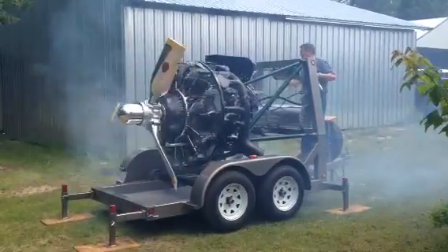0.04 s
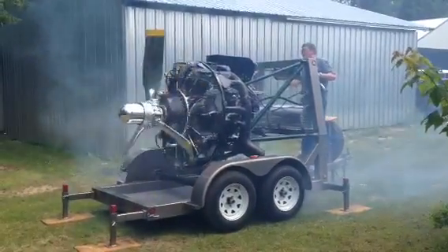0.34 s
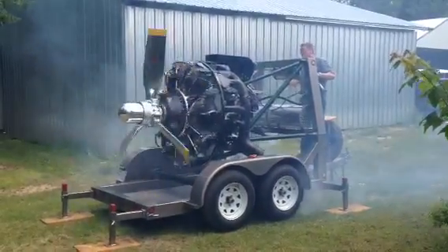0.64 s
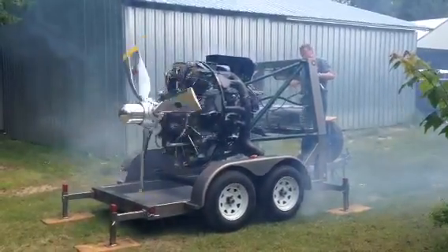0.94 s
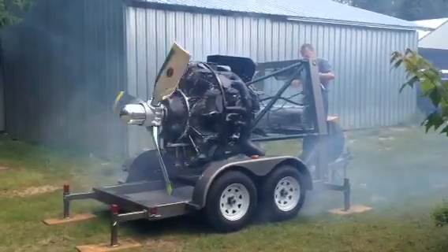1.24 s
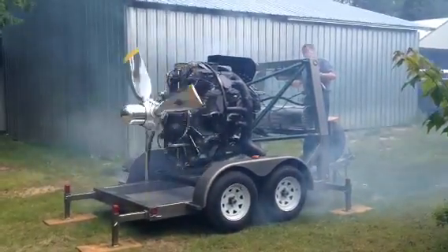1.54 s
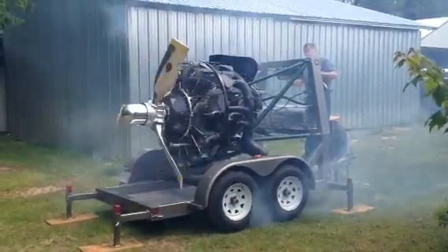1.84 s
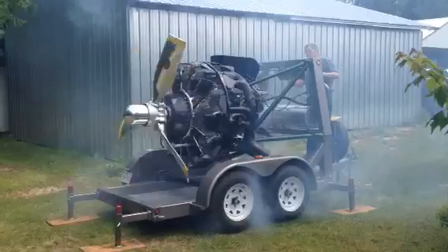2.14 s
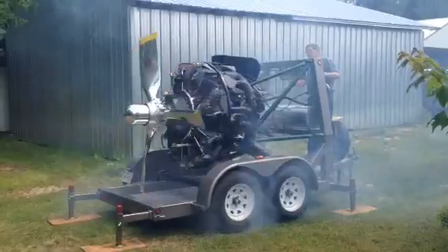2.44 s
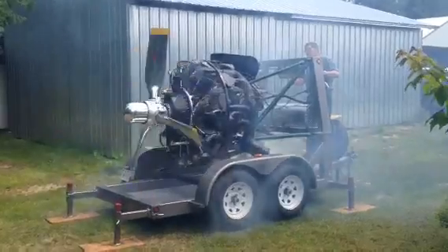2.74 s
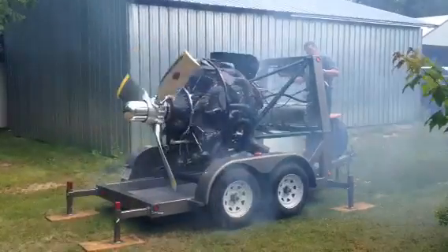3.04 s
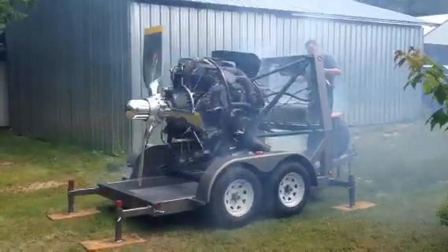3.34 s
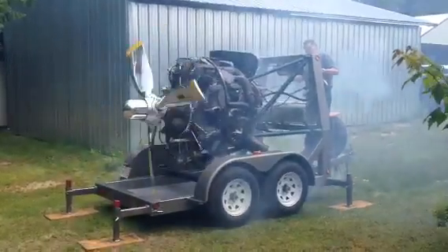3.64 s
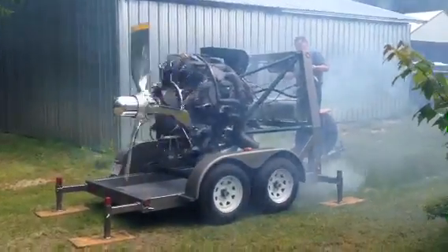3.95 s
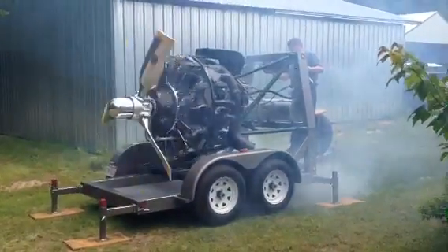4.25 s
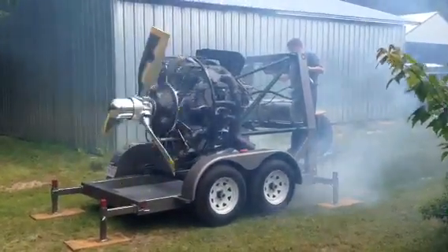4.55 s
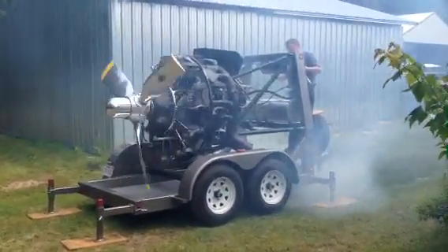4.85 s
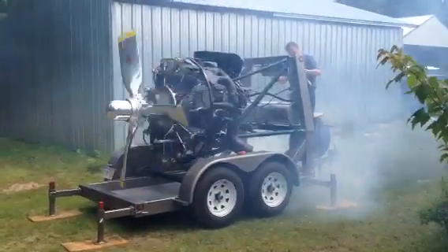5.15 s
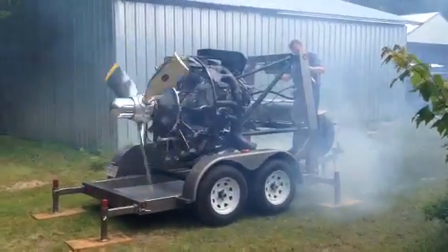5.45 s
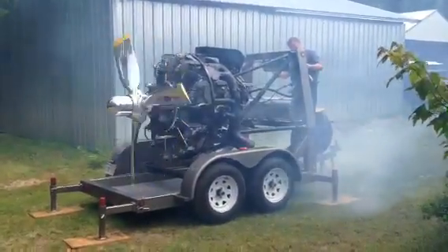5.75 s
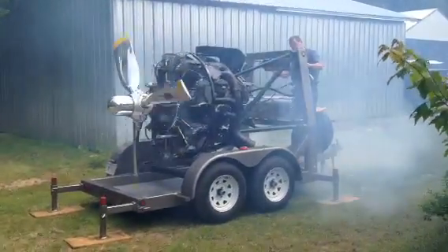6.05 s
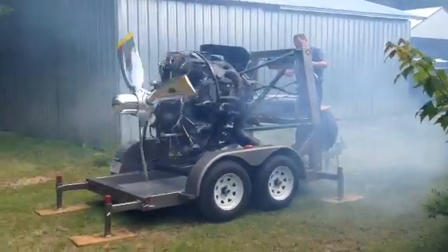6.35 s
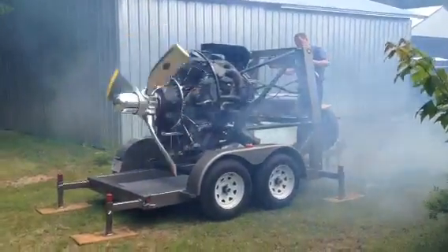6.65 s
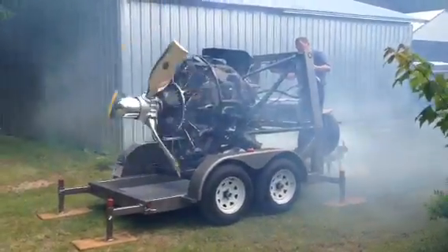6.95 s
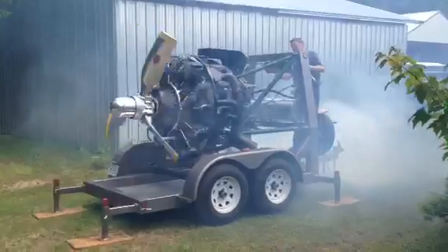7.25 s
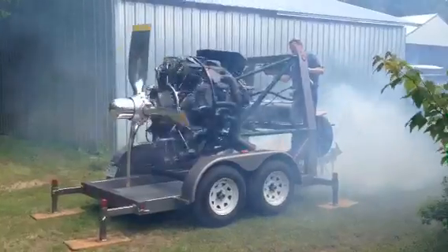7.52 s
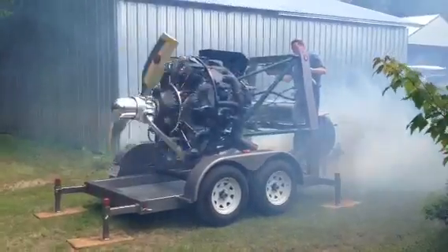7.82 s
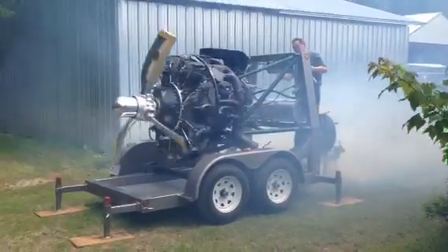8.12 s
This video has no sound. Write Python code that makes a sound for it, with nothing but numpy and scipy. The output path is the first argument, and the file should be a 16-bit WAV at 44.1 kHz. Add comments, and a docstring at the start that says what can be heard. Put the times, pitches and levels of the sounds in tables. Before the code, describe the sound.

Gears rattle, valves clack and unfired cylinders chuff as a big radial aircraft engine turns over in a yard. Sharp, barking exhaust pops with low thumps come singly and in clusters, running together briefly before stumbling again. In the last couple of seconds the engine speeds up and fires almost continuously, with short gaps. A slight outdoor echo trails the pops.

```python
"""A big radial aircraft engine starts on a trailer in front of a metal shed, outdoors.
First a few cylinders pop through open exhaust stubs (short pipes), and the crank slows with a faint whistle.
More pops follow, joining into two short, even runs near 3 s before falling back to single pops.
From about 6.3 s the engine catches and fires in three more runs. All along, gear rattle, valve clacks
and the chuff of unfired cylinders follow the speed of the crank, and the yard adds a short echo."""
import sys
import numpy as np
from scipy import signal
from scipy.io import wavfile
from scipy.ndimage import uniform_filter1d

SR = 44100
rng = np.random.default_rng(int(sys.argv[2]) if len(sys.argv) > 2 else 0)


def transcribe(u):
    """Save the signal u as a 16-bit wav file named by the first command-line argument.

    u: samples, shape (n,) or (channels, n), limited to [-1, 1]; the rate is SR.
    q: integer samples, one column per channel.
    """
    v = np.clip(np.atleast_2d(u).T, -1, 1)
    q = np.round(v * 32767).astype(np.int16)
    wavfile.write(sys.argv[1], SR, q)


N = 360738

# How long the yard takes to fade by 60 dB: pitch_hz, fade_s
YARD_FADE = [(150, 0.23), (1500, 0.26), (8000, 0.2), (15000, 0.1)]
# How fast the crank turns: time_s, share_of_full_speed
CRANK_SPEED = [(0, 0.42), (.6, 0.28), (1.08, 0.23), (1.48, 0.25), (2.45, 0.57), (3.08, 0.52), (3.7, 0.48),
               (4.05, 0.37), (4.5, 0.42), (5.35, 0.37), (6.2, 0.38), (6.79, 0.94), (6.87, .75),
               (7.17, 0.73), (7.33, .47), (7.7, 0.77), (8.18, 0.84)]
# The tone of each noise, from low to high: pitch_hz, relative_level_db
PUMPING_TONE = [(30, -51), (80, -10), (122, -3), (220, -2), (330, -10), (900, -32)]  # unfired cylinders blowing into the exhaust
RATTLE_TONE = [(70, -54.5), (170, -4), (300, -3), (470, 1), (575, 2), (720, -2), (1100, 2.5), (1750, 1.5),
               (2400, 2), (3100, -6.5), (4200, -20), (8000, -36.5)]  # gears and cams
AIR_TONE = [(3000, -18), (5000, -3.5), (8300, 5), (12000, -6.5), (15300, -6)]  # hiss of unburnt air
CLACK_TONE = [(500, -54), (1100, -10), (2400, 7), (4400, -21), (8400, -1.5), (11000, 0.5), (15300, -10)]  # steel hitting steel
JET_TONE = [(2000, -30.5), (3200, -28), (4500, -19), (6400, -4), (8500, -2), (11500, -6.5), (13500, -5.5),
            (15300, -5)]  # sharp crack of the exhaust jet
BARK_TONE = [(90, -62), (300, -13.5), (750, -2.5), (1150, -7), (1550, -2), (2750, -2), (3500, -6.5),
             (4600, -17), (8000, -45)]  # blast of gas in the stub
THUMP_TONE = [(20, -49), (50, -44.5), (90, -12.5), (160, 4.5), (300, -6.5), (700, -22.5)]  # deep push of the gas
# Separate steel clacks at set times while the crank turns slowly: start_s, level_db
SEPARATE_VALVE_CLACKS = [(0.603, -34), (1.106, -58), (1.515, -26), (4.007, -31), (5.529, -26), (5.829, -38)]
# The notes an exhaust stub can ring at: pitch_hz, width_hz, relative_level_db
STUB_NOTES = [(846, 5, 18), (1401, 140, 6), (1600, 13, 5.5), (1973, 21, 5.5), (2360, 130, 0),
              (2756, 33, -5)]
# Single firings. Crack is the jet's level; body is the base level for honk and thump.
# Ring is the stub's strongest note: start_s, crack_db, body_db, honk_hz, ring_hz
SINGLE_POPS = [(0.0, -13, -22.5, 570, 2330), (0.056, -10.5, -22, 685, 1580),
               (0.183, -22.5, -27.5, 527, 2470), (0.402, -15.5, -23.5, 420, 1460),
               (1.212, -14, -21.5, 492, 1430), (1.309, -13, -20.5, 610, 1390),
               (1.54, -14.5, -25.5, 424, 1960), (1.626, -16.5, -22, 450, 1420),
               (1.731, -12, -20.5, 460, 2610), (1.824, -11.5, -18.5, 405, 1970),
               (1.915, -11.0, -16, 621, 1923), (2.058, -13.0, -24, 650, 2640),
               (2.124, -10, -23.5, 543, 1990), (2.2, -14.0, -26, 630, 1600),
               (2.294, -21.0, -21.5, 565, 1460), (2.401, -14, -21.5, 590, 2410),
               (2.469, -15.5, -20, 574, 1580), (2.528, -19.5, -19.5, 378, 2160),
               (3.299, -22.5, -17.0, 567, 2490), (3.372, -14.5, -18.5, 359, 2370),
               (3.438, -19, -22, 685, 2630), (3.488, -14, -14.5, 611.7, 2434),
               (3.825, -17.5, -22, 577, 1630), (3.887, -12.5, -20, 423, 1248),
               (4.111, -11.0, -19, 410, 2170), (4.225, -25.0, -49, 685, 2455),
               (4.509, -16.5, -18.5, 447, 1999), (4.606, -17.5, -22, 528.7, 1966),
               (4.843, -13, -26, 585, 1393), (4.915, -22, -20, 567, 2667), (4.946, -10.5, -17.5, 460, 2620),
               (5.01, -17.5, -18, 542.8, 1540), (5.427, -13, -26, 434.2, 1980),
               (5.59, -9.5, -17.0, 430, 1963), (5.688, -16, -27, 331, 2660), (5.865, -22, -25.5, 582, 2021),
               (5.892, -12, -21, 457, 2000), (6.02, -17.0, -21, 435, 2317), (6.087, -13, -18, 435, 1800),
               (6.183, -18, -20.5, 530, 1090), (6.238, -13, -20, 570, 2201),
               (7.246, -15, -16.5, 574.5, 1067), (7.358, -19.0, -15, 536, 1560),
               (7.645, -14, -22.5, 416, 1580), (7.701, -19.5, -16, 500, 2010),
               (7.766, -8, -12, 552.2, 2767)]
# Runs where one cylinder after another fires: start_s, end_s, firings_per_s, crack_db, body_db
FIRING_RUNS = [(2.665, 2.96, 18.96, -11, -15), (3.131, 3.273, 28, -14.5, -16.5),
               (6.296, 6.82, 23.8, -13.5, -18.5), (7.4, 7.585, 28.4, -12.5, -17),
               (7.817, 8.184, 21.4, -13.5, -16)]


def gain_of(db):
    """Turns decibels into a number to multiply a sound by."""
    return 10 ** (np.asarray(db) / 20)


def evened(x):
    """Scales a signal so its average strength (rms) is 1."""
    return x / np.sqrt(np.mean(x ** 2) + 1e-20)


def look_up(table, hz):
    """Reads between the rows of a table, giving every octave the same room."""
    pitches, values = np.transpose(table)
    return np.interp(np.log(hz + 1), np.log(pitches + 1), values)


def add(mix, start_s, sound):
    """Mixes a sound in at its start time."""
    part = mix[max(round(start_s * SR), 0):][:len(sound)]
    part += sound[:len(part)]


def tone_filter(tone, size=4096):
    """Turns a tone table into a filter that never sounds before its input does."""
    log_gain = np.log(gain_of(look_up(tone, abs(np.fft.fftfreq(size, 1 / SR)))))
    return np.fft.ifft(np.exp(np.conj(signal.hilbert(log_gain)))).real[:size // 2]


def colour(x, taps):
    """Passes a sound through a filter and keeps its length."""
    return signal.oaconvolve(x, taps)[:len(x)]


def resonate(x, hz, width_hz):
    """Makes a sound ring at one pitch; a smaller width rings longer."""
    fade = np.exp(-np.pi * width_hz / SR)
    return 2 * signal.lfilter([1 - fade], [1, -fade * np.exp(2j * np.pi * hz / SR)], x).real


def wander(per_s):
    """A random curve that drifts to a new value per_s times a second."""
    steps = rng.standard_normal(N // 32)
    return evened(np.interp(np.arange(N) / SR * per_s, np.arange(len(steps)), steps))


def puff(t, rise_s, decay_s, emptying=1.58):
    """Gas flow that swells as a valve opens and dies ever faster as the cylinder empties."""
    swell = np.sin(np.pi / 2 * np.minimum(t / rise_s, 1)) ** 2
    return swell * np.exp(-(np.maximum(t - rise_s, 0) / decay_s) ** emptying)


def sized(x, flow, db):
    """Gives a sound the energy of a puff that peaks at db."""
    return gain_of(db) * x * np.linalg.norm(flow) / (np.linalg.norm(x) + 1e-12)


def crank_speed():
    """The crank's share of full speed at every sample."""
    return np.interp(np.arange(N) / SR, *np.transpose(CRANK_SPEED))


def level_at(speed, full_db, halving_db):
    """Level in dB of a part that loses halving_db each time the speed halves."""
    return full_db + halving_db * np.log2(speed)


def yard_echo(sound, delay_s=.018, echoes_per_s=3000):
    """The shed wall and the trailer scatter the sound into many tiny, fading echoes."""
    echoes = rng.choice([-1., 1.], SR // 2) * (rng.random(SR // 2) < echoes_per_s / SR)
    hz, t, spectrum = signal.stft(echoes, SR, nperseg=256)
    fade = gain_of(-60 * t / look_up(YARD_FADE, hz)[:, None])
    tail = signal.istft(spectrum * fade, SR)[1]
    out = np.zeros(N)
    add(out, delay_s, colour(sound, tail / np.linalg.norm(tail)))
    return out


def whistle(hz=9039, waver_hz=12, level_db=-56, peak_s=1.17, swell_s=.3):
    """A thin, high whistle comes and goes around the time the crank is slowest."""
    swell = np.exp(-((np.arange(N) / SR - peak_s) / swell_s) ** 2)
    cycles = np.cumsum(hz + waver_hz * wander(23)) / SR
    return gain_of(level_db) * swell * evened(np.sin(2 * np.pi * cycles))


def pumping(hz=152, glide=0.19, width_hz=18, chuff_db=6.0, breath=0.31):
    """Unfired cylinders blow into the exhaust, whose hollow note slides as valves open and shut."""
    pitch_hz = hz * np.exp(glide * np.tanh(wander(16)))
    spin = np.exp(2j * np.pi * np.cumsum(pitch_hz) / SR)
    air = rng.standard_normal(N)
    fade = np.exp(-np.pi * width_hz / SR)
    note = 2 * (spin * signal.lfilter([1 - fade], [1, -fade], air / spin)).real  # rings at pitch_hz
    blown = colour(note + breath * air, tone_filter(PUMPING_TONE))
    blown /= np.sqrt(uniform_filter1d(blown ** 2, size=4000) + 1e-12)  # strokes move about equal air
    return evened(blown * gain_of(chuff_db * np.tanh(wander(25))))


def knocking(noise, tone, per_s, decay_s, share):
    """Random knocks make a noise jump and die away; share is how much of it they control."""
    hits = (rng.random(N) < per_s / SR) * rng.uniform(0.39, 1, N)
    knocks = evened(signal.lfilter([1], [1, -np.exp(-1 / (decay_s * SR))], hits))
    return evened(colour(noise * (1 - share + share * knocks), tone_filter(tone)))


def machinery(choke_speed=0.68):
    """Gears and cams rattle in the crankcase while the pistons pump unburnt air."""
    speed = crank_speed()
    gear_noise, air_noise = rng.standard_normal((2, N))
    rattle = knocking(gear_noise, RATTLE_TONE, per_s=26, decay_s=0.028, share=0.46)
    rattle *= gain_of(level_at(speed, full_db=-20.5, halving_db=7.35))
    air = knocking(air_noise, AIR_TONE, per_s=28, decay_s=0.023, share=0.76)
    air *= gain_of(level_at(speed, full_db=-18, halving_db=16.2))
    flow = np.minimum(speed / choke_speed, 1)  # once the exhaust chokes, the chuff grows no louder
    chuff = pumping() * gain_of(level_at(flow, full_db=-25, halving_db=13.5))
    return rattle + chuff + air


def valve_clacks(full_speed_per_s=29, scatter_db=0.5):
    """Each time a bump on the cam comes round, a valve lever closes its gap with a steel clack."""
    out, t = np.zeros(N), np.arange(SR // 10) / SR
    steel, speed = tone_filter(CLACK_TONE), crank_speed()
    hit = puff(t, rise_s=0.0023, decay_s=0.026)
    bumps_passed = np.floor(.3 + np.cumsum(full_speed_per_s * speed) / SR)
    clack_db = level_at(speed, full_db=-17.5, halving_db=12.9)
    regular = [(at / SR, clack_db[at] - scatter_db * np.tanh(rng.standard_normal()))
               for at in np.flatnonzero(np.diff(bumps_passed))]
    for start_s, db in SEPARATE_VALVE_CLACKS + regular:
        clack = colour(rng.standard_normal(len(t)) * hit, steel)
        add(out, start_s, sized(clack, hit, db))
    return out


def jet_crack(noise, flow, crackle, dulling=0.49):
    """Gas shoots out in a hissing jet, which sounds duller as it slows."""
    dull = uniform_filter1d(noise, size=3)
    hiss = dull + (noise - dull) * flow ** dulling
    return colour(hiss * flow * crackle, tone_filter(JET_TONE))


def stub_bark(blast, ring_hz, ring_db=10.5, others_db=-5.5):
    """A blast rings one main note of its stub and stirs the other notes by chance."""
    gas = colour(blast, tone_filter(BARK_TONE))
    shares = gain_of(others_db) * evened(rng.exponential(size=len(STUB_NOTES)))
    others = sum(share * gain_of(db) * resonate(gas, hz, width_hz)
                 for share, (hz, width_hz, db) in zip(shares, STUB_NOTES))
    return gas + others + gain_of(ring_db) * resonate(gas, ring_hz, width_hz=58)


def stub_honk(gas, hz, breath=0.26):
    """The first rush of gas sets the stub honking before the jet is fully open."""
    rush = resonate(gas, hz, width_hz=290)
    return resonate(rush, hz, width_hz=38) + breath * rush


def gas_thump(gas, hz=167, pitch_scatter=0.1, boom_db=6.0):
    """All the gas in the pipe booms, at a pitch that shifts with its heat (picked by chance)."""
    push = colour(gas, tone_filter(THUMP_TONE))
    boom_hz = hz * np.exp(pitch_scatter * rng.standard_normal())
    return push + gain_of(boom_db) * resonate(push, boom_hz, width_hz=40)


def run_firings(edge_db=-3, jitter_s=.003, crack_scatter_db=3.1, body_scatter_db=3.5,
                honk_hz=456.5, honk_scatter=.13, ring_range_hz=(1410, 2710)):
    """Lists the nearly even firings of each run, which builds up and then falters."""
    rows = []
    for start_s, end_s, per_s, crack_db, body_db in FIRING_RUNS:
        for time_s in np.arange(start_s, end_s, 1 / per_s):
            crack, body, pitch, late = rng.uniform(-0.95, 1, size=4) * np.sqrt(3)
            swell_db = edge_db * (2 * (time_s - start_s) / (end_s - start_s) - 1) ** 2
            rows.append((time_s + jitter_s * late,  # each firing lands a little early or late
                         crack_db + swell_db + crack_scatter_db * crack,
                         body_db + swell_db + body_scatter_db * body,
                         honk_hz * np.exp(honk_scatter * pitch),
                         rng.uniform(*ring_range_hz)))
    return rows


def firings(lead_s=.007, crackle_db=0.56, warming_db_per_s=0.38):
    """Each firing starts with a thump and honk; a moment later it barks and hisses at once."""
    out, t = np.zeros(N), np.arange(SR // 4) / SR
    rows = sorted(SINGLE_POPS + run_firings())
    pauses = np.diff([row[0] for row in rows], prepend=-1)
    for pause_s, (start_s, crack_db, body_db, honk_hz, ring_hz) in zip(pauses, rows):
        # a firing kicks the crank on, so one that follows closely opens and empties faster
        stretch = np.interp(pause_s, [.065, .12], [.78, 1.02])
        rise_s = 0.014 * stretch
        jet_noise, bark_noise, honk_noise, thump_noise, swirls = rng.standard_normal((5, len(t)))
        crackle = gain_of(crackle_db * evened(uniform_filter1d(swirls, size=50)))  # the jet breaks up

        jet_flow = puff(t, rise_s, decay_s=0.032 * stretch)
        add(out, start_s, sized(jet_crack(jet_noise, jet_flow, crackle), jet_flow, crack_db))

        flow = puff(t, rise_s, decay_s=0.034 * stretch)
        bark = stub_bark(bark_noise * flow * crackle, ring_hz)
        bark_db = crack_db + 0.23 * (body_db - crack_db) - 2  # follows the crack more than the body
        add(out, start_s, sized(bark, flow, bark_db))

        honk = stub_honk(honk_noise * puff(t, rise_s, decay_s=0.022), honk_hz)
        add(out, start_s - lead_s, sized(honk, flow, body_db - 1.67))

        thump = gas_thump(thump_noise * puff(t, rise_s, decay_s=0.019))
        thump_db = body_db - 1.24 + warming_db_per_s * start_s  # fills out as the cylinders warm
        add(out, start_s - lead_s, sized(thump, flow, thump_db))
    return out


def scene(echo_db=-12):
    """The engine and its echo in the yard, in one channel."""
    engine = machinery() + whistle() + firings() + valve_clacks()
    return (engine + gain_of(echo_db) * yard_echo(engine))[None]


def record(dry, ceiling=0.5, low_cut_hz=32, high_cut_hz=15350):
    """The microphone drops the deepest bass; then peaks are rounded and the highest treble is cut."""
    dry = signal.sosfilt(signal.butter(2, low_cut_hz, "high", fs=SR, output="sos"), dry)
    rounded = dry / (1 + (dry / ceiling) ** 4) ** (1 / 4)
    treble_cut = signal.firwin(1023, high_cut_hz, window=("kaiser", 9), fs=SR)
    return signal.oaconvolve(rounded, treble_cut[None], "same")


dry = scene()
out = record(dry)
transcribe(out)
```